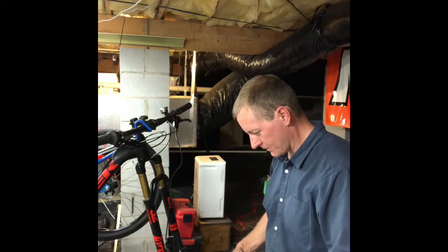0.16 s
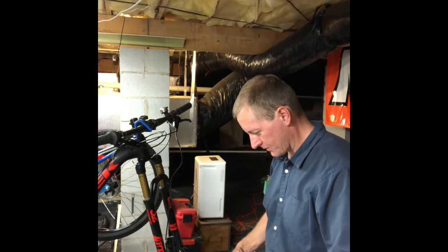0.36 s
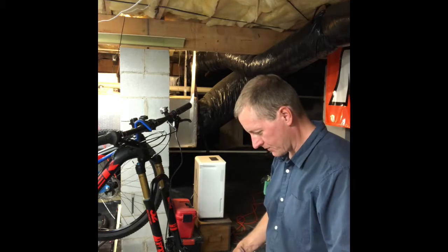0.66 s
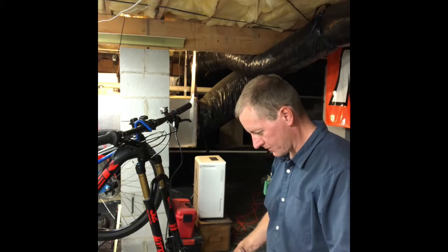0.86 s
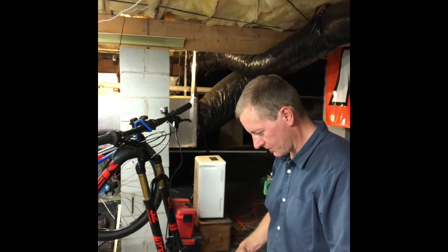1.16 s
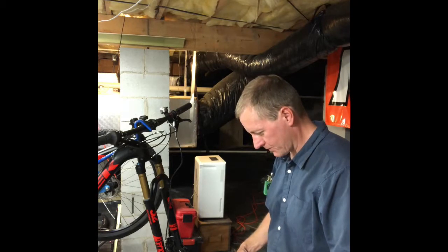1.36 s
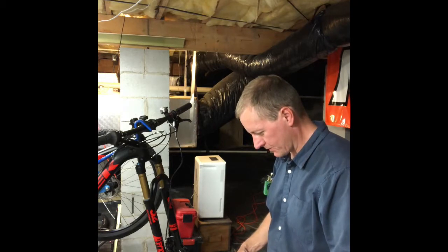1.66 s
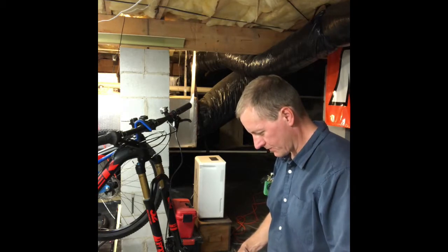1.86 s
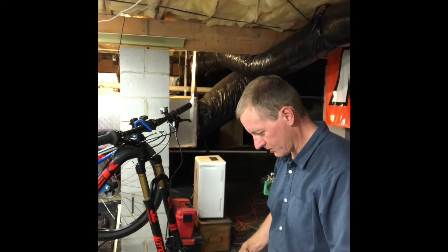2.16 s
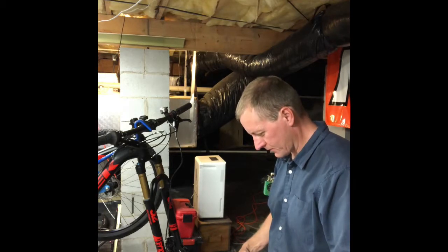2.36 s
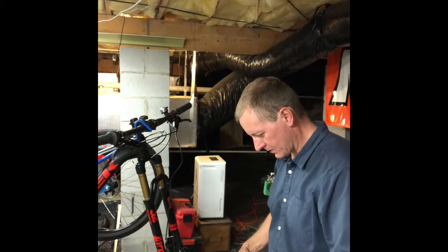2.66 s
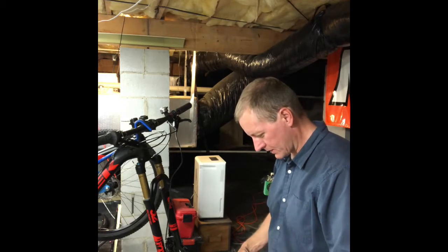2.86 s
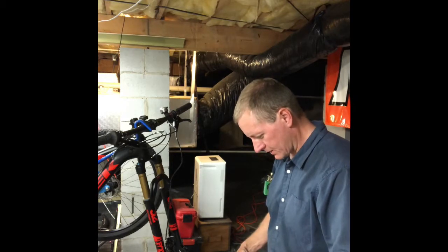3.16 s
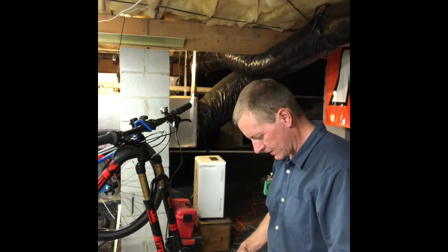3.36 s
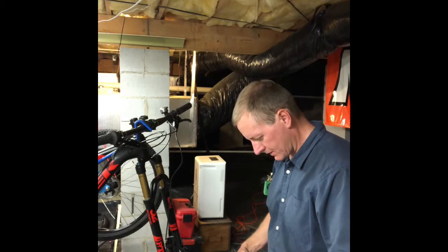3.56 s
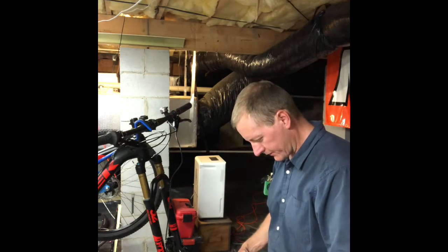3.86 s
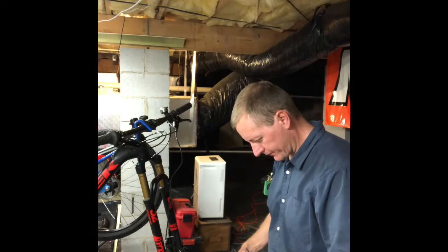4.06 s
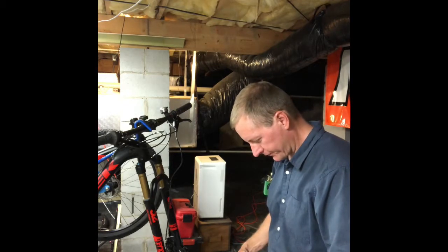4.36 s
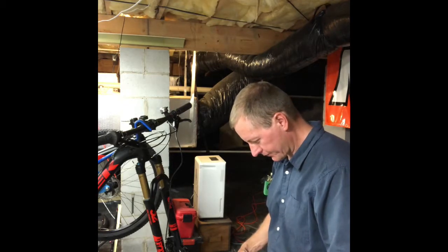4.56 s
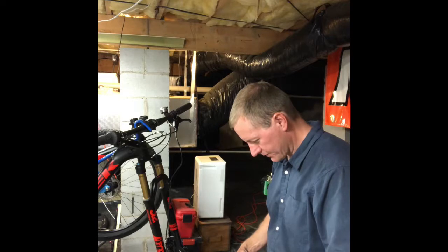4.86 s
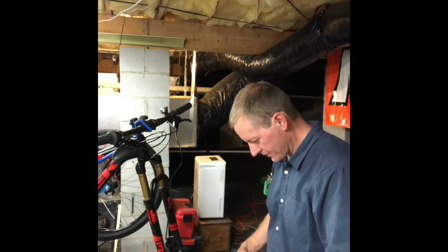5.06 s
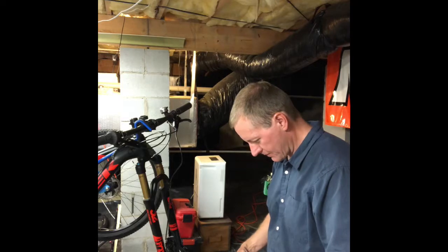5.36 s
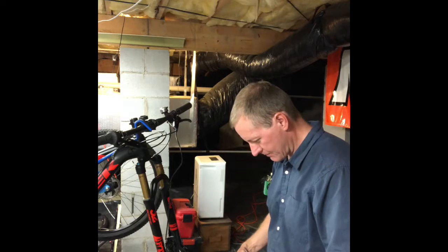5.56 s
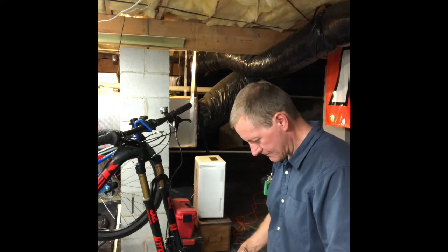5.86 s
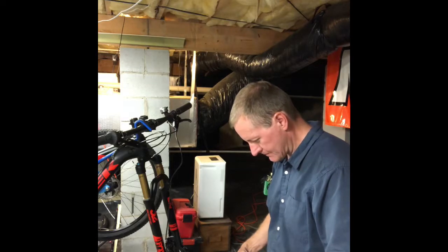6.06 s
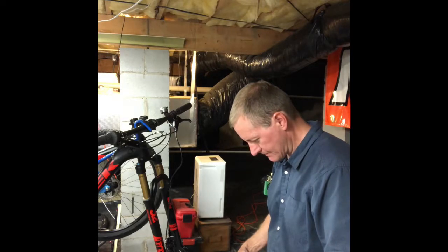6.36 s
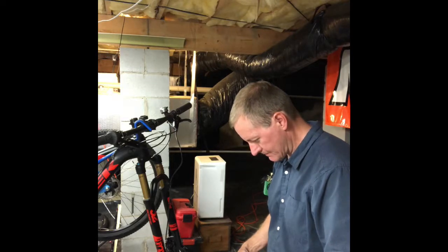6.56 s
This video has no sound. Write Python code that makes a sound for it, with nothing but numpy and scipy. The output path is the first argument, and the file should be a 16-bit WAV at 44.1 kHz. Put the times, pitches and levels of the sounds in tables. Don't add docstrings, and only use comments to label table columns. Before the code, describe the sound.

A close microphone in a small basement workshop picks up compressed air rushing into a bicycle tire: a bright, steady, slightly fluttering hiss with thin whistles, over a quiet low motor hum and rumble. At about 0.65 s the flow eases noticeably; at 1.03 s a crisp metal trigger click, with tiny rebounds, brings it back stronger before it settles. At 1.4 s the tire bead pops onto the rim, a short rubbery slap with a puff of air and a faint hollow wheel ring. The hiss continues evenly. At 3.2 s a far louder, harder snap cracks out, followed by small knocks and brief ringing, with a faint tick near 3.75 s. From 5.25 s the hiss fades down, exposing the motor hum, until a clattering double click at 5.95 s releases a fresh burst of air that continues to the end around 6.5 s. Room reverberation is short.

```python
import sys
import numpy as np
from scipy import signal
from scipy.fft import rfft, irfft
from scipy.io import wavfile
from scipy.ndimage import uniform_filter1d

SR = 44100
rng = np.random.default_rng(int(sys.argv[2]) if len(sys.argv) > 2 else 0)


def to_wav(sig):
    pcm = np.clip(np.atleast_2d(sig), -1, 1) * 32767
    pcm = np.round(pcm).astype(np.int16)
    wavfile.write(sys.argv[1], SR, pcm.T)


def volts_from_decibels(level):
    exponent = np.asarray(level, float) / 20
    return 10 ** exponent


N = 295470


def rms_one(x):
    return x / np.sqrt(np.mean(x ** 2) + 1e-20)


def at_hz(points, hz):
    points_hz, values = np.array(points).T
    return np.interp(np.log(hz + 1), np.log(points_hz), values)


def coloured(spectrum):
    hz = np.arange(N // 2 + 1) * SR / N
    white = rfft(rng.standard_normal(N))
    return rms_one(irfft(white * volts_from_decibels(at_hz(spectrum, hz)), N))


def drift(rate):
    r = np.exp(-2 * np.pi * rate / SR)
    slow = signal.lfilter([1], [1, -2 * r, r * r], rng.standard_normal(N + SR))
    return rms_one(slow[SR:])


def ring(drive, hz, t60):
    r = volts_from_decibels(-60 / (max(t60, 0.002) * SR))
    w = 2 * np.pi * hz / SR
    return signal.lfilter([0, np.sin(w)], [1, -2 * r * np.cos(w), r * r], drive)


def slap(click, hz, t60):
    out = ring(ring(click, hz, t60), hz, 2.0 / hz)
    return out / np.max(np.abs(out))


def strike(out, s, sound):
    return out + np.pad(sound, (round(s * SR), N))[:N]


def room(x):
    # frequency in Hz, reverberation time t60 in seconds.
    decay_times = [(150, 0.33), (400, 0.2), (900, 0.5), (1500, 0.42), (4000, 0.23), (12000, 0.11)]
    t = np.arange(SR // 2) / SR
    tail = np.zeros(len(t))
    for low in 60 * 2 ** np.arange(8):
        octave = signal.butter(2, [low, 2 * low], "band", fs=SR, output="sos")
        t60 = max(at_hz(decay_times, low * np.sqrt(2)), 0.02)
        tail += signal.sosfilt(octave, rng.standard_normal(len(t))) * volts_from_decibels(-60 * t / t60)
    tail *= np.clip((t - 0.003) / 0.0016, 0, 1)
    return signal.fftconvolve(x, tail / np.sqrt(np.sum(tail ** 2)))[:N]


def valve_flow():
    # start in seconds, flow just after in dB, settled flow in dB, settling time in seconds.
    valve_moves = [
        (0, 0.9, 0.3, 0.3),
        (0.648, -2.5, -6.5, 0.3),
        (1.03, 3, 0.54, 0.17),
        (5.245, -0.5, -16, 0.85),
        (5.941, 3, 0.1, 0.37),
    ]
    t = np.arange(N) / SR
    moves = np.array(valve_moves)
    latest = np.maximum(np.searchsorted(moves[:, 0], t, "right") - 1, 0)
    s, first_db, settled_db, settle_s = moves[latest].T
    flow_db = settled_db + (first_db - settled_db) * np.exp((s - t) / settle_s)
    return uniform_filter1d(flow_db, size=400, mode="nearest")


def near_echoes(hiss):
    decay = volts_from_decibels(-60 * np.arange(2000) / SR / 0.08)
    echoes = rms_one(rng.standard_normal((2, 2000)) * decay) / np.sqrt(2000)
    high_pass = signal.butter(2, 4000, "high", fs=SR, output="sos")
    bright = signal.sosfilt(high_pass, hiss)
    first, second = signal.fftconvolve(bright[None], echoes, axes=1)[:, :N]
    turn = 0.8 * drift(0.3)
    wet = volts_from_decibels(-8)
    return (hiss + wet * (np.cos(turn) * first + np.sin(turn) * second)) / np.sqrt(1 + wet ** 2)


def air():
    # frequency in Hz, level in dB per Hz; main range, then top range.
    jet_body = [(700, -34), (1000, -12.5), (1300, -15), (1700, -12), (2200, -7), (2800, -6), (3070, -9),
                (3400, -5.5), (4900, -7.5), (6100, -4.5), (7600, -3), (9400, -6.5), (11000, -5),
                (13000, -15.5)]
    jet_top = [(9000, -36.5), (10500, -11), (11500, 0.5), (12500, 3.5), (13500, 2.5), (14500, 1),
               (15400, 2.5), (16500, 2)]
    # frequency in Hz, width in Hz, rms in dB, share following the flow (0-1).
    whistles = [(2330, 530, -68.5, 0), (6160, 150, -64.5, 1), (7250, 65, -86, .9), (7420, 190, -64, .12),
                (11200, 150, -71, .9), (12080, 300, -69, .9), (12780, 450, -67, .9), (15100, 250, -72, .1),
                (15650, 145, -68, .1)]
    flow_db = valve_flow()
    body_db = -51 + flow_db
    top_db = -47 + flow_db * np.where(flow_db > 0, 2.1, 1.2)
    hiss = volts_from_decibels(body_db + 0.18 * drift(13)) * coloured(jet_body)
    hiss += volts_from_decibels(top_db + 0.35 * drift(7.56)) * coloured(jet_top)
    tones = np.zeros(N)
    for hz, width, level_db, share in whistles:
        t60 = np.log(1000) / (np.pi * width)
        tone = rms_one(ring(ring(rng.standard_normal(N), hz, t60), hz, t60))
        tones += volts_from_decibels(level_db + share * flow_db) * tone
    return tones + near_echoes(hiss)


def fan():
    # frequency in Hz, level in dB per Hz.
    rumble = [(25, -38), (45, -9), (60, 1), (80, -1), (105, -4), (140, -8.5), (230, -12), (270, -13.5),
              (330, -10), (540, -12), (640, -18), (900, -21.5), (1500, -27), (2000, -44)]
    # frequency in Hz, rms in dB.
    hum = [(120, -56), (227, -68), (240, -76.5), (883, -74)]
    t = np.arange(N) / SR
    tones = np.zeros(N)
    for hz, level_db in hum:
        tones += volts_from_decibels(level_db + 0.5 * drift(2)) * np.sin(2 * np.pi * hz * t)
    return volts_from_decibels(-52.5) * coloured(rumble) + np.sqrt(2) * tones


def trigger():
    # start in seconds, peak in dB, crack in dB.
    pulls = [
        [(1.0297, -30.5, 5), (1.0318, -43, 15), (1.042, -43, 12), (1.1095, -40, 8), (1.113, -54, 5)],
        [(5.9467, -30, 6), (5.9492, -32, 2), (5.9525, -40, 10), (5.9585, -34, -16), (5.963, -30, -10),
         (6.038, -47.5, 0)],
    ]
    # mode in Hz, level in dB on the first pull, level in dB on the second, t60 in seconds.
    metal_modes = [(1030, -25.5, -14, 0.069), (1400, -5, -9.5, 0.02), (1715, -16, -11.5, 0.045),
                   (1990, -15, -10, 0.024), (2375, -12, -12.5, 0.056), (2670, -9.5, -12, 0.061),
                   (3274, -9, -15, 0.059), (4120, -5, -17, .02), (4730, -6, -2.5, 0.015),
                   (6890, -2, -3, 0.014), (9800, -10, -13, 0.0067), (10900, -17, -2, 0.0084)]
    first_low_hz = [900, 950]
    rebound_low_hz = 1900
    sharp_hz, dull_hz = 11900, 3870
    sharp_t60, dull_t60 = 0.013, 0.021
    t = np.arange(SR // 4) / SR
    click = (t == 0) + 1e-18
    out = np.zeros(N)
    for pull, contacts in enumerate(pulls):
        for s, peak_db, crack_db in contacts:
            sharp = np.exp(min(contacts[0][0] - s, 0) / 0.0048)
            crack_t60 = dull_t60 + sharp * (sharp_t60 - dull_t60)
            high_hz = dull_hz + sharp * (sharp_hz - dull_hz)
            low_hz = rebound_low_hz + sharp * (first_low_hz[pull] - rebound_low_hz)
            sound = volts_from_decibels(crack_db - 60 * t / crack_t60) * rng.standard_normal(len(t))
            for hz, *level_db, t60 in metal_modes:
                sound += volts_from_decibels(level_db[pull]) * ring(click, hz, t60) * rng.choice([-1, 1])
            band = signal.butter(3, [low_hz, high_hz], "band", fs=SR, output="sos")
            out = strike(out, s, volts_from_decibels(peak_db) * signal.sosfilt(band, sound))
    return out + volts_from_decibels(-12.5) * room(out)


def wheel_ring(click, modes):
    t = np.arange(SR) / SR
    rings = np.zeros(SR)
    for k, (hz, level_db, t60) in enumerate(modes):
        waver = volts_from_decibels(level_db + 2.2 * drift(22)[:SR])
        build = 1 - np.exp(-t * hz / 1.7)
        rings += waver * build * ring(click, hz, t60) * (-1) ** k
    return rings


def bead():
    # start in seconds, peak in dB, slap in Hz, slap t60 in seconds, puff in dB.
    snaps = [
        (1.4190, -16, 1630, 0.0084, -15.5),
        (3.2173, -3.5, 1091, 0.0081, -9.5),
    ]
    # start in seconds, peak in dB, slap in Hz.
    slips = [(1.415, -41, 1500), (1.4166, -21, 2300), (1.4239, -17, 755), (1.4303, -28, 480),
             (3.207, -35, 1000), (3.2115, -41, 1000), (3.212, -40, 900), (3.2164, -22.5, 2060),
             (3.2285, -22, 1150), (3.239, -22.5, 510), (3.279, -34, 1700), (3.764, -40, 900)]
    # mode in Hz, level in dB, t60 in seconds.
    light_modes = [(104, 5, 0.086), (142, 0, 0.15), (158, -7.5, 0.78), (236.6, -14, 0.39), (307, -7, 0.5),
                   (335, -7.5, 0.48), (390, -10.5, 0.92), (474, -4.5, 0.35), (580, -23, 0.22),
                   (759, -13, 0.36), (815, -18, 0.4), (1046, -16, 0.23), (1362, -16, 0.22), (1500, -8, .08),
                   (1717, -10, 0.15), (1960, -7, 0.094), (2390, -17, 0.079)]
    hard_modes = [(158, -13, .75), (237, -2, .15), (316, -12, 0.45), (345, -6, 0.22), (364, -17, 0.89),
                  (475.4, -3, 0.27), (614, -4, 0.14), (823, 0.5, 0.14), (995, -12, 0.23), (1127, -7, 0.16),
                  (1096, -13, 0.38), (1155, -9, 0.16), (1215, -12, .2), (1430, -1, 0.1),
                  (1482, -19.5, 0.47), (1577, -2, 0.083), (1760, -11, 0.089), (2300, -5, 0.086)]
    ring_levels = [-14.5, -16]
    crack_levels = [-36, -33.5]
    stiff_levels = [-4, -0.5]
    # frequency in Hz, level in dB.
    overtones = [(2300, -6), (3200, -10), (5000, -25), (6500, -27)]
    # frequency in Hz, level in dB per Hz.
    puff_spectrum = [(88, -43), (150, -15.5), (420, -0.5), (560, -5), (760, -3.5), (1050, -4), (2450, -9.5),
                     (3540, -18), (4540, -22.5), (15000, -45.5)]
    t = np.arange(SR) / SR
    blows, wheel = np.zeros(N), np.zeros(N)
    click = signal.lfilter([0.25, 0.5, 0.25], [1], (t == 0) + 1e-18)
    settings = zip(snaps, [light_modes, hard_modes], ring_levels, crack_levels, stiff_levels)
    for (s, peak_db, slap_hz, slap_t60, puff_db), modes, ring_db, crack_db, stiff_db in settings:
        wheel = strike(wheel, s, volts_from_decibels(peak_db + ring_db) * wheel_ring(click, modes))
        blow = slap(click, slap_hz, slap_t60)
        for hz, level_db in overtones:
            blow += volts_from_decibels(level_db + stiff_db) * slap(click, hz, 0.005)
        swell = 1 - np.exp(-t / 0.001)
        blow += volts_from_decibels(puff_db - 60 * t / 0.11) * swell * coloured(puff_spectrum)[:SR]
        blow += volts_from_decibels(crack_db - 60 * t / 0.036) * np.diff(rng.standard_normal(SR + 1))
        blows = strike(blows, s, volts_from_decibels(peak_db) * blow)
    for s, peak_db, slap_hz in slips:
        blows = strike(blows, s, volts_from_decibels(peak_db) * slap(click, slap_hz, 0.0064))
    out = wheel + blows + volts_from_decibels(-21) * room(blows)
    high_pass = signal.butter(4, 85, "high", fs=SR, output="sos")
    return signal.sosfilt(high_pass, out)


def scene():
    mono = air() + fan() + trigger() + bead()
    return np.array([mono, mono])


def split_bands(x):
    size = 2048
    side = np.zeros(N)
    for start, place, wide in rng.random((38, 3)):
        at = int(start * (N - size))
        low = 4400 * 3.2 ** place
        band = signal.butter(4, [low, low + 600 + 1200 * wide ** 2], "band", fs=SR, output="sos")
        own = signal.sosfilt(band, x[at:at + size][::-1]) * signal.windows.tukey(size, 0.8)
        side[at:at + size] += volts_from_decibels(-3) * own
    return side * [[1], [-1]]


def top_cut(x):
    return signal.sosfilt(signal.butter(12, 16970, fs=SR, output="sos"), x)


def record(dry):
    low_pass = signal.ellip(16, 0.2, 70, 15745, fs=SR, output="sos")
    cut = signal.sosfilt(low_pass, np.tanh(dry))
    return top_cut(cut + split_bands(cut[0]))


dry = scene()
out = record(dry)
to_wav(out)
```